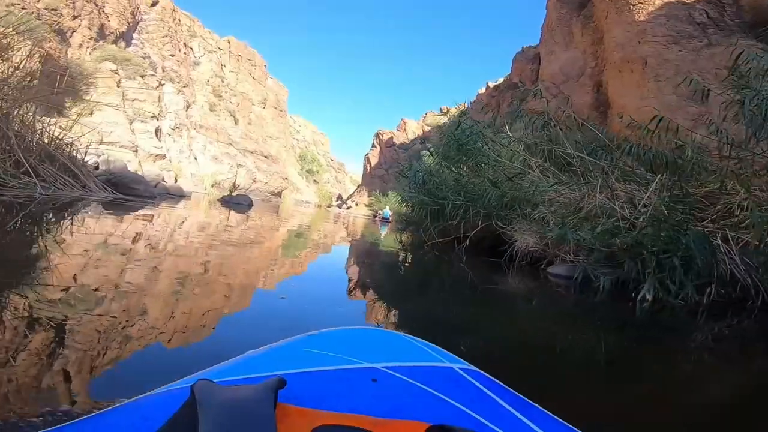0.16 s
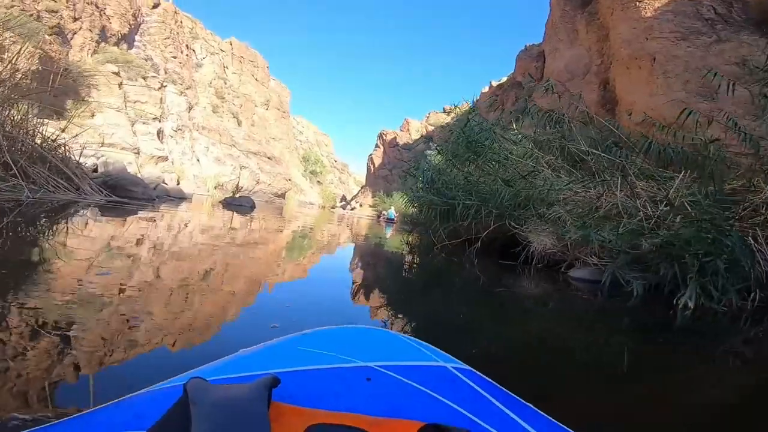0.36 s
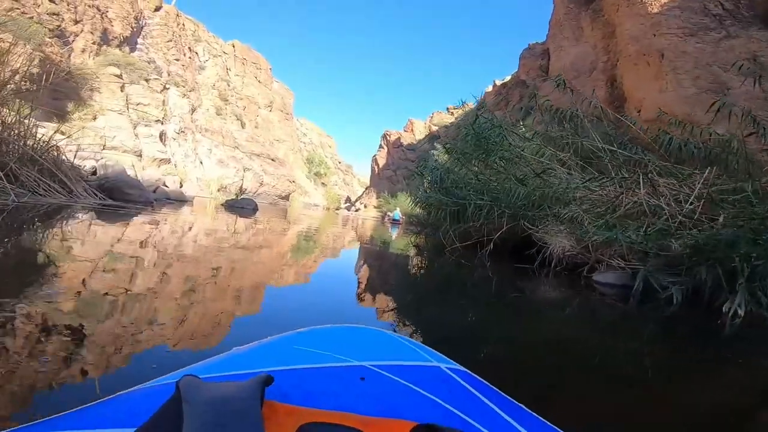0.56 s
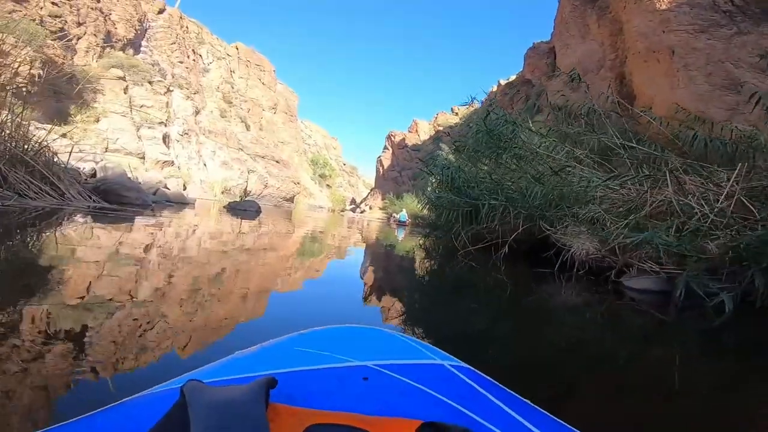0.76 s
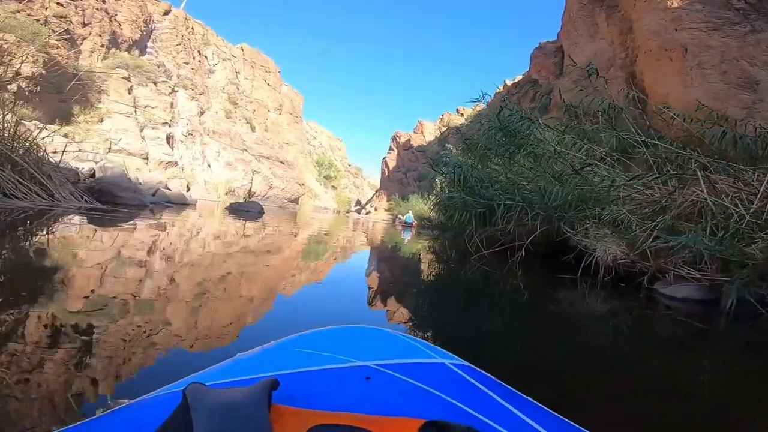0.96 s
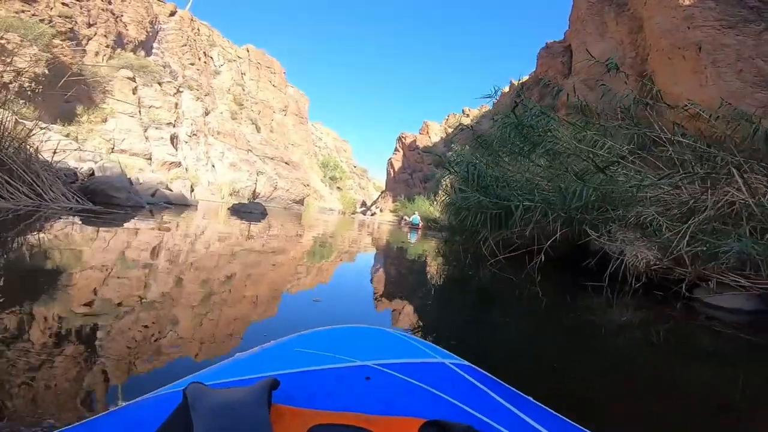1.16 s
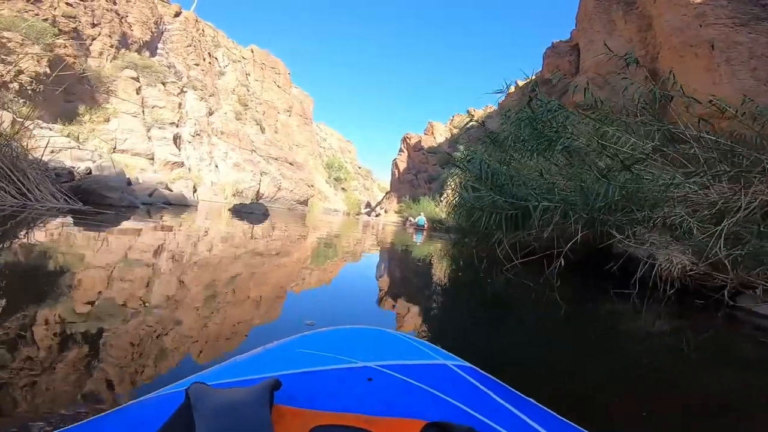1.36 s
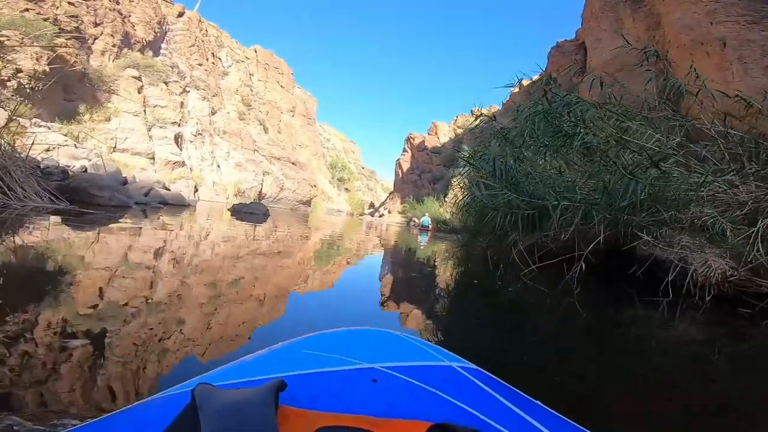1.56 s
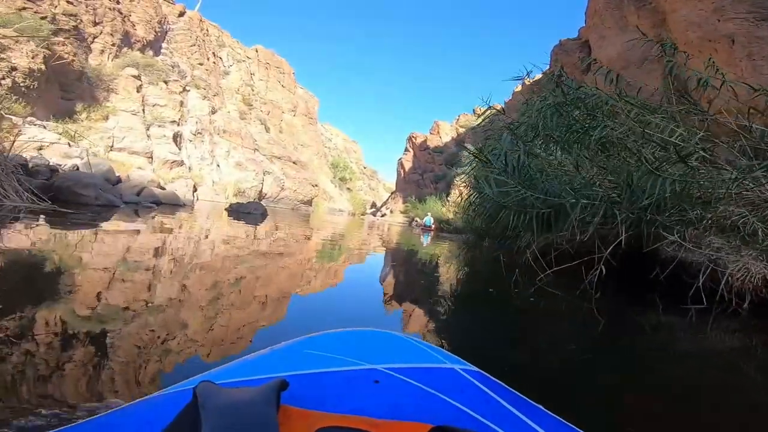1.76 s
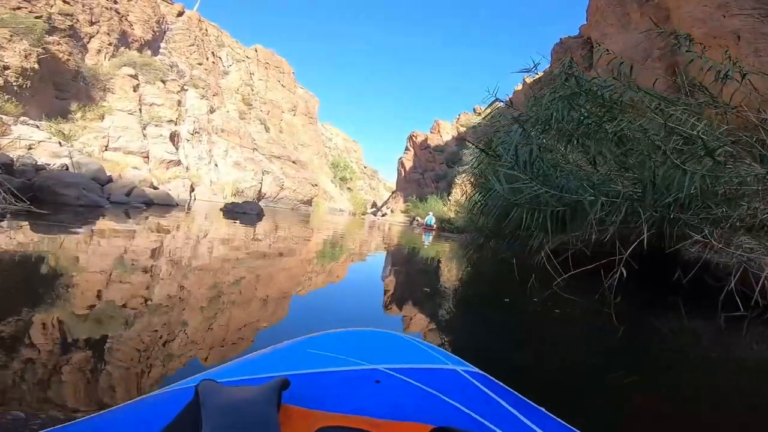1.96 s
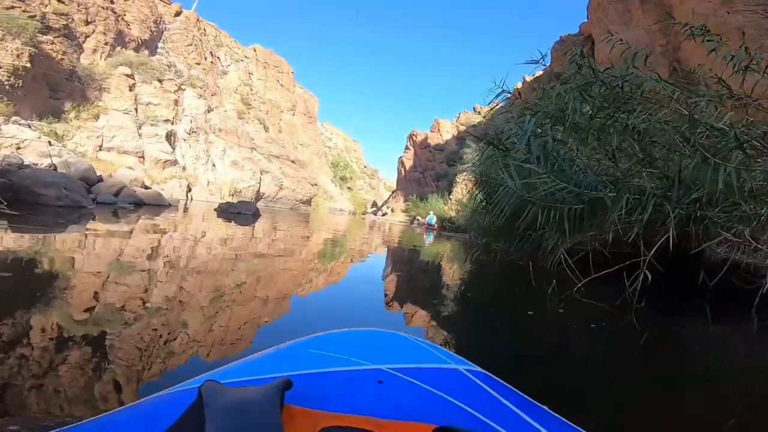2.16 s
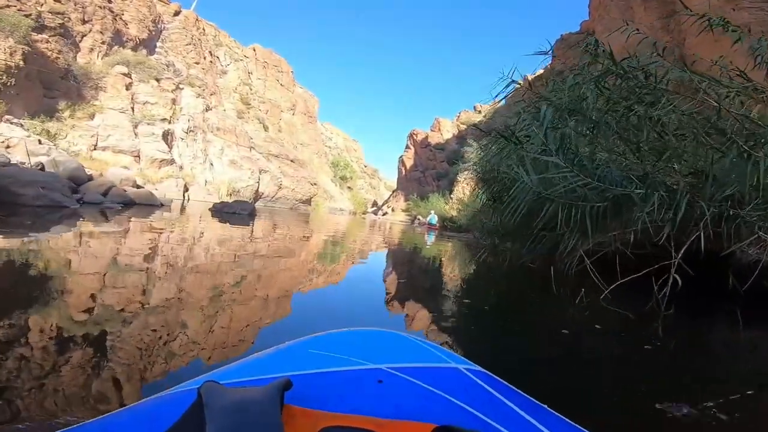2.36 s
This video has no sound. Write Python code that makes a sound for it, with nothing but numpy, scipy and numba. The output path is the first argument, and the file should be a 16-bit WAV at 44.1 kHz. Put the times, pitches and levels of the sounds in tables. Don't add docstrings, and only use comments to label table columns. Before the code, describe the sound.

A kayak paddle moves through calm water. Bright drops plink at once on the right, a brief splash bursts at 0.2 seconds, and a big ringing plop with a sharp snap and rising squeak lands near 0.5. Sparse drips follow; from 0.9 to 1.8 bubbles and spray burble more centrally, then thin out. Dull hull knocks recur; low wind buffets mostly during the first second.

```python
import sys
import numpy as np
from scipy import signal
from scipy.fft import rfft, irfft
from scipy.io import wavfile
from scipy.ndimage import uniform_filter1d
from numba import njit

SR = 44100
rng = np.random.default_rng(int(sys.argv[2]) if len(sys.argv) > 2 else 0)


def log_audio(samples):
    frames = np.atleast_2d(samples).T
    limited = np.clip(frames, -1, 1)
    pcm = np.round(limited * 32767).astype(np.int16)
    wavfile.write(sys.argv[1], SR, pcm)


def amplitude_ratio(level_db):
    exponent = np.asarray(level_db, float) / 20
    return 10 ** exponent


N = 105840

# (time [s], level [dB], left-right [dB])
STIR = [(0, -62, -10.5), (.15, -58.5, -12.5), (.3, -48.5, -11.5), (.43, -63, -5), (.47, -55.5, -15),
        (.62, -62, -11.5), (.8, -49.5, -7.5), (1.1, -44, -2), (1.29, -45.5, -1.5), (1.48, -41.5, -3),
        (1.75, -44.5, -0.5), (1.95, -51, -10.5), (2.4, -51, -4)]
# (frequency [Hz], density [dB per Hz])
SPLASH_COLOUR = [(290, -71), (500, -33), (868, -7), (2190, 1), (4030, -13), (7530, -7.5), (16000, -37)]
LAG_S_PER_DB = .000013


def rms_one(x):
    return x / np.sqrt(np.mean(x ** 2) + 1e-20)


def in_time(rows):
    s, *columns = np.transpose(rows)
    return [np.interp(np.arange(N) / SR, s, c) for c in columns]


def at_hz(points, hz):
    f, v = np.transpose(points)
    return np.interp(np.log(hz + 1), np.log(f), v)


def sides(pan_db):
    left = amplitude_ratio(pan_db) ** 2
    return np.sqrt(2 * np.array([left, left ** 0]) / (1 + left))


def drift(rate):
    r = np.exp(-80 * np.pi * rate / SR)
    slow = signal.lfilter([1], [1, -2 * r, r * r], rng.standard_normal(N // 40 + 2002))[2000:]
    return np.interp(np.arange(N) / 40, np.arange(len(slow)), rms_one(slow - slow.mean()))


def coloured(spectrum, alike):
    mid, side = rng.standard_normal((2, N))
    alike = np.clip(alike, 0, 1)
    pair = np.sqrt(1 + alike) * mid + np.sqrt(1 - alike) * side * [[1], [-1]]
    gain = amplitude_ratio(at_hz(spectrum, np.arange(N // 2 + 1) * SR / N))
    return rms_one(irfft(rfft(pair) * gain, N))


@njit
def add(out, start, hz, t60, rise, left, right, lag, onset, bend, sr):
    for k in range(len(start)):
        phase, step, height = 0., 2 * np.pi * hz[k] / sr, 1.
        fade, glide = 1000 ** (-1 / (t60[k] * sr)), 2 ** (rise[k] / sr)
        for i in range(start[k], min(out.shape[1], start[k] + int(t60[k] * sr))):
            v = height * min(1., phase / onset) ** 2
            out[0, i] += left[k] * v * np.sin(phase - step * lag[k])
            out[1, i] += right[k] * v * np.sin(phase)
            phase, step, height = phase + step, min(step * glide, 2.8), height * fade
            glide += bend


def bubbles(s, db, hz, t60, rise, pan_db, onset, bend=0.):
    pan = pan_db + 0 * s
    out = np.zeros((2, N))
    left, right = amplitude_ratio(db) * sides(pan)
    start, lag = (s * SR).astype(np.int64), pan * LAG_S_PER_DB * SR
    glide_bend = bend * np.log(2) / SR ** 2
    add(out, start, hz * 1., np.abs(t60), rise + 0 * s, left, right, lag,
        max(onset, .1), glide_bend, float(SR))
    return out


def swells(s, db, hz, cycles, rise, pan_db):
    out = np.zeros((2, N))
    for at, level_db, f, turns, up, pan in np.broadcast(s, db, hz, cycles, rise, pan_db):
        size = int(turns / f * SR)
        t = (np.arange(size) - size / 2) / SR
        phase = np.cumsum(2 * np.pi * f * 2 ** (up * t) / SR)
        lag = 2 * np.pi * f * pan * LAG_S_PER_DB * np.array([[1], [0]])
        start = int(at * SR) - size // 2
        swell = np.hanning(size) * np.sin(phase - lag)
        out[:, start:start + size] += amplitude_ratio(level_db) * sides(pan)[:, None] * swell
    return out


def swarm(per_s, colour, cycles, rise, spread_db, clump_db, onset, share=1):
    scatter_db = 8
    s, pitch, size, place, life, keep, turn = rng.random((7, 24000))
    s, low, high = s * N / SR, colour[0][0], colour[-1][0]
    at, hz = (s * SR).astype(int), low * (high / low) ** pitch
    born = (keep < per_s * N / SR / len(s)) & (at < share * N)
    db = at_hz(colour, hz) + 20 * np.log10(hz)
    db = db - spread_db * np.log(np.maximum(size, .03)) + clump_db * drift(34)[at]
    pan = in_time(STIR)[1][at] + scatter_db * (2 * place - 1)
    pan = pan * np.minimum(hz / 900, 1)
    t60 = cycles * (0.82 + 1.26 * life) / hz
    track = bubbles(s[born], db[born], hz[born], t60[born], (rise * 2 * turn)[born], pan[born], onset)
    return rms_one(track) * np.sqrt(share)


def quiet():
    # (frequency [Hz], density [dB per Hz])
    hush = [(59, -64), (135, -10), (595, -16.5), (1280, -6), (9820, -39), (16000, -47)]
    return amplitude_ratio(-61) * coloured(hush, 0.17)


def burble():
    # (frequency [Hz], density [dB per Hz])
    burble_colour = [(120, -43), (200, -13), (340, -12), (1250, -1.5), (5000, -22), (6500, -33),
                     (11000, -120)]
    wash_db = -7
    db, pan = in_time(STIR)
    wash = amplitude_ratio(wash_db + 2 * drift(36)) * sides(pan) * coloured(burble_colour, 0.54)
    small = swarm(1900, burble_colour, cycles=26, rise=5, spread_db=2.1, clump_db=1.48, onset=9.5)
    return amplitude_ratio(db) * (small + wash)


def spray():
    # (time [s], level [dB])
    strength = [(0, -56), (.15, -68.5), (.3, -57.5), (.46, -64.5), (.65, -77.5), (.85, -63), (1.0, -71),
                (1.2, -55), (1.29, -65), (1.43, -53.5), (1.76, -57.5), (1.9, -64), (2.1, -54), (2.4, -61.5)]
    # (frequency [Hz], density [dB per Hz])
    spray_colour = [(1470, -36), (2500, -5), (4140, -6.5), (8600, -2.5), (14700, -26), (16000, -63)]
    hiss_db = -5
    db, = in_time(strength)
    hiss = amplitude_ratio(hiss_db + 2.8 * drift(27)) * sides(in_time(STIR)[1]) * coloured(spray_colour, 0.71)
    fizz = swarm(1800, spray_colour, cycles=15, rise=21.0, spread_db=2.5, clump_db=4.5, onset=9.1)
    return amplitude_ratio(db) * (fizz + hiss)


def rumble(top_hz, order):
    bottom_hz = 24.2
    low_pass = signal.butter(order, top_hz, fs=SR, output="sos")
    high_pass = signal.butter(2, bottom_hz, "high", fs=SR, output="sos")
    noise = rng.standard_normal((2, N + SR))
    low = signal.sosfilt(np.vstack([low_pass, high_pass]), noise)[:, SR:]
    return rms_one(low / np.sqrt(uniform_filter1d(low ** 2, size=2600) + 1e-9))


def wind():
    # (time [s], half length [s], level [dB], left-right [dB])
    gusts = [(0.298, 0.029, -31, -13), (.36, 0.026, -44, -3), (0.423, 0.036, -26, -13.5),
             (0.457, 0.024, -30, -10), (0.494, 0.061, -45, 14), (0.676, 0.055, -36.5, -12),
             (.71, 0.039, -30, 20), (0.789, 0.042, -30, 6.5), (0.848, 0.057, -30.5, 14),
             (1.054, 0.045, -42.5, -4), (1.173, 0.074, -46, 2), (1.243, 0.031, -50, -6),
             (1.403, 0.04, -45, 4), (1.574, 0.13, -52, -2), (1.756, 0.12, -55, -4), (1.97, 0.056, -51.5, 5),
             (2.098, 0.047, -48, 3), (2.206, 0.036, -42.5, -1), (2.35, 0.15, -48, 6)]
    breeze_db, bright_at_db = -84, -34
    t = np.arange(N) / SR
    force = amplitude_ratio(breeze_db)
    for s, half, db, pan in gusts:
        force = force + amplitude_ratio(db) * sides(pan)[:, None] * np.exp(-((t - s) / half) ** 4)
    bright = force / (force + amplitude_ratio(bright_at_db))
    return force * (bright * rumble(106.7, order=4) + (1 - bright) * rumble(44, order=6))


def drops():
    # (time [s], peak level [dB], pitch [Hz], left-right [dB])
    drop_table = [(0.038, -19.5, 2690, -14), (0.079, -20.5, 3390, -18), (0.35, -24.5, 1575, -24),
                  (0.4, -29, 1280, -7), (0.597, -27.5, 1136, -31), (0.765, -31, 1730, -20),
                  (0.963, -24, 835, -13), (0.987, -18.5, 1660, -22), (1.077, -27.5, 1515, -27),
                  (1.167, -26, 1605, 1), (1.415, -21, 1670, -13), (1.423, -21, 1310, -29)]
    cycles, rise, gain_db = 32.5, 1, -2
    s, db, hz, pan = np.transpose(drop_table)
    return bubbles(s, db + gain_db, hz, cycles / hz, rise, pan, onset=5.44)


def splashes():
    # (time [s], attack [s], release [s], level [dB])
    sheets = [
        (.075, .008, .015, -49),
        (.182, .003, .02, -47),
        (.214, .014, .013, -27),
        (.344, .008, .03, -43),
        (.395, .018, .015, -47),
    ]
    t = np.arange(N) / SR
    shape = np.zeros(N)
    for s, up, down, db in sheets:
        attack, release = np.exp(-((t - s) / up) ** 2), np.exp(-np.abs(t - s) / down)
        shape += amplitude_ratio(db) * np.where(t < s, attack, release)
    dense = swarm(9500, SPLASH_COLOUR, cycles=9, rise=0., spread_db=3, clump_db=0, onset=2.32, share=1 / 4)
    return shape * dense


def knocks():
    # (time [s], peak level [dB])
    knock_table = [
        (0.078, -40),
        (.368, -33),
        (0.962, -36),
        (1.223, -40.5),
        (1.502, -34),
        (1.864, -47.5),
    ]
    modes = [194, 306, 597, 900]
    t60_s = 0.018
    s, db = np.transpose(knock_table)
    return sum(bubbles(s, db, hz + 0 * s, t60_s + 0 * s, 0., 0, onset=2.58) for hz in modes)


def smacks():
    # (time [s], peak level [dB], colour [Hz])
    smack_table = [(0.1774, -39.5, 4330), (0.336, -40, 6460), (0.397, -39, 6640), (0.4238, -40, 6600),
                   (0.5456, -51.5, 7650), (0.6254, -54, 10100), (0.9432, -50.5, 4060), (1.0754, -49, 5670),
                   (1.4216, -39, 5270), (1.5516, -42.5, 5400), (1.6022, -41, 5660), (2.131, -49, 8510)]
    ring_cycles, ring_db, crack_db, crack_s = 40, 6.5, 1.5, 0.0011
    s, db, hz = np.transpose(smack_table)
    at = (s * SR).astype(int)
    pan, kicks = in_time(STIR)[1][at], np.zeros((2, N))
    kicks[:, at] = amplitude_ratio(db + crack_db) * sides(pan)
    fall = np.exp(-1 / (crack_s * SR))
    shape = signal.lfilter([np.e * (1 - fall)], [1, -2 * fall, fall ** 2], kicks + 1e-18)
    crack = shape * coloured(SPLASH_COLOUR, 0.3)
    return crack + bubbles(s, db + ring_db, hz, ring_cycles / hz, 0., pan, onset=4.0)


def plops():
    # (time of peak [s], level [dB], pitch [Hz], length [cycles], rise [octaves per s])
    squeaks = [
        (.54, -33, 1330, 20, 70),
        (.554, -34, 1480, 22, 65),
        (.274, -33, 1680, 22, 3),
        (.279, -40, 2700, 18, 110),
        (1.128, -42, 800, 40, 17),
    ]
    # (time [s], peak level [dB], pitch [Hz], t60 [s], rise [octaves per s])
    rings = [
        (.97, -38, 415, .25, 0),
        (.382, -51, 3750, .45, 0),
        (.4886, -11, 7000, .003, 0),
        (.4886, -27, 3600, .003, 0),
    ]
    big_plop = [
        (.4885, -20.5, 590, .13, 1.5),
    ]
    large_bubbles = [
        (0.567, -43.5, 2660, 0.03, 2),
        (.639, -42.5, 900, 0.045, -2),
        (.678, -44.5, 1014, 0.15, 4.5),
        (0.849, -51.5, 313, 0.55, 4),
        (1.5, -41, 306, 0.14, -7),
    ]
    pan_db = -11.5
    large = bubbles(*np.transpose(large_bubbles + rings), pan_db, onset=1.84)
    big = bubbles(*np.transpose(big_plop), pan_db, onset=1.84, bend=300)
    return large + big + swells(*np.transpose(squeaks), -16)


def blips():
    # (time of peak [s], level [dB], pitch [Hz], left-right [dB])
    soft_table = [(0.277, -44.0, 2520.0, -14.0), (0.289, -45.0, 840.0, -14.0), (0.35, -44.0, 2410.0, -18.0),
                  (0.369, -44.0, 820.0, -11.0), (0.374, -45.0, 2110.0, -12.0), (0.384, -45.0, 1870.0, -9.0),
                  (0.4, -45.0, 1870.0, -5.0), (0.773, -44.0, 1250.0, -24.0), (0.862, -43.0, 730.0, 7.0),
                  (0.881, -39.0, 1310.0, -10.0), (0.924, -41.0, 1850.0, -29.0),
                  (0.931, -40.0, 1610.0, -12.0), (0.968, -39.0, 540.0, -2.0), (0.972, -42.0, 1230.0, -12.0),
                  (0.975, -37.0, 1590.0, -14.0), (0.99, -42.0, 2520.0, -20.0), (0.992, -43.0, 970.0, -10.0),
                  (1.022, -42.0, 1250.0, -11.0), (1.058, -36.0, 1030.0, 10.0), (1.078, -41.0, 930.0, 6.0),
                  (1.14, -42.0, 990.0, 12.0), (1.181, -42.0, 690.0, 6.0), (1.212, -39.0, 1100.0, 1.0),
                  (1.225, -43.0, 690.0, -5.0), (1.328, -45.0, 2500.0, 0.0), (1.333, -37.0, 1100.0, -11.0),
                  (1.391, -43.0, 1980.0, 6.0), (1.405, -40.0, 820.0, 4.0), (1.419, -40.0, 800.0, -5.0),
                  (1.444, -38.0, 1360.0, -11.0), (1.461, -40.0, 1510.0, 4.0), (1.507, -40.0, 540.0, 0.0),
                  (1.507, -40.0, 800.0, -9.0), (1.508, -38.0, 1340.0, -22.0), (1.521, -42.0, 2020.0, -10.0),
                  (1.538, -37.0, 1230.0, -18.0), (1.542, -41.0, 1590.0, -12.0),
                  (1.566, -36.0, 1250.0, -8.0), (1.617, -41.0, 800.0, 5.0), (1.628, -30.0, 1740.0, -15.0),
                  (1.714, -41.0, 1250.0, -14.0), (1.759, -39.0, 1310.0, -4.0), (1.76, -34.0, 840.0, 5.0),
                  (1.769, -43.0, 1960.0, 3.0), (1.799, -43.0, 2150.0, 3.0), (1.833, -39.0, 1030.0, 2.0),
                  (1.869, -44.0, 1120.0, -8.0), (1.941, -48.0, 2430.0, -15.0), (2.057, -47.0, 1770.0, -7.0),
                  (2.255, -42.0, 1140.0, -9.0)]
    # (time of peak [s], level [dB], pitch [Hz])
    tick_table = [(.365, -49, 7470), (.383, -47, 3900), (.716, -57, 3600), (.83, -52, 3640),
                  (.9, -51, 3400), (1.075, -48, 3640), (1.151, -50, 4800), (1.209, -48, 3660),
                  (1.22, -49, 4100), (1.317, -49, 3400), (1.346, -49, 5100), (1.364, -49, 4650),
                  (1.431, -48, 8600), (1.539, -47, 4400), (1.584, -47, 3500), (1.648, -46, 4760),
                  (1.689, -46, 2900), (1.768, -46, 3600), (1.786, -50, 4400)]
    soft_db, soft_s, soft_rise = 3.5, .015, 3.5
    tick_db, tick_cycles = 6, 13
    s, db, hz, pan = np.transpose(soft_table)
    soft = swells(s, db + soft_db, hz, soft_s * hz, soft_rise, pan)
    s, db, hz = np.transpose(tick_table)
    pan = in_time(STIR)[1][(s * SR).astype(int)]
    return soft + swells(s, db + tick_db, hz, tick_cycles, 0, pan)


def channel(x):
    echo_db, echo_t60_s = -16, .1
    t = np.arange(SR // 4) / SR
    tail = rng.standard_normal((2, len(t))) * amplitude_ratio(-60 * t / echo_t60_s) * (t > .002)
    tail = signal.lfilter([1], [1, -.6], tail)
    tail = tail / np.sqrt((tail ** 2).sum(1))[:, None]
    return x + amplitude_ratio(echo_db) * signal.fftconvolve(x.mean(0)[None], tail)[:, :N]


def ports(water):
    # (frequency [Hz], phase [radians])
    port_phase = [(3800, -1), (5200, 1), (10000, -3.5), (12000, 3.5)]
    lead = at_hz(port_phase, np.arange(N // 2 + 1) * SR / N) / 2
    return irfft(rfft(water) * np.exp(1j * lead * [[1], [-1]]), N)


def scene():
    wake = burble() + spray()
    blade = drops() + splashes() + smacks() + plops()
    water = channel(wake + blade + knocks() + blips())
    return ports(water) + quiet() + wind()


def roll_off(x):
    return signal.sosfilt(signal.butter(12, 16470, fs=SR, output="sos"), x)


def record(dry):
    top_hz = 12500
    mix = signal.sosfilt(signal.butter(4, top_hz, fs=SR, output="sos"), dry)
    return roll_off(mix)


dry = scene()
out = record(dry)
log_audio(out)
```